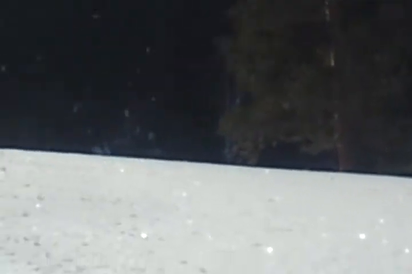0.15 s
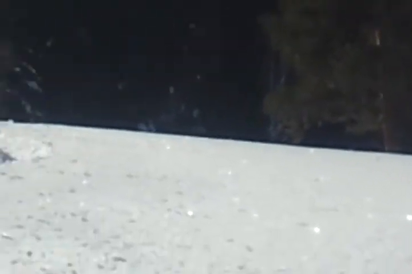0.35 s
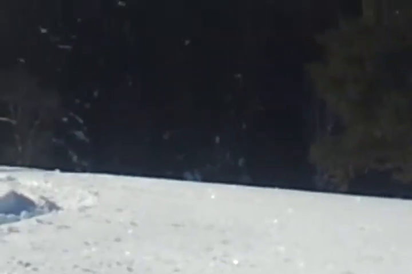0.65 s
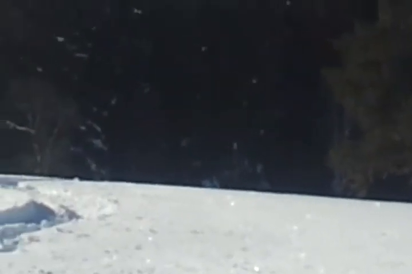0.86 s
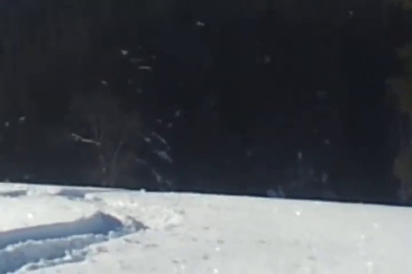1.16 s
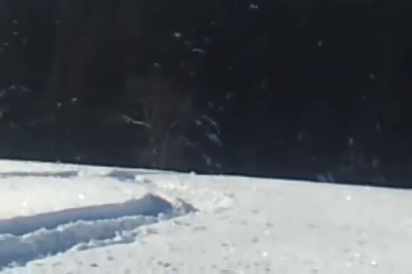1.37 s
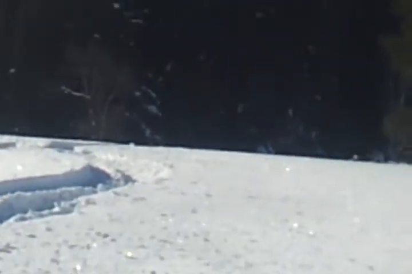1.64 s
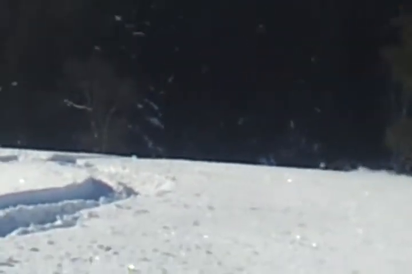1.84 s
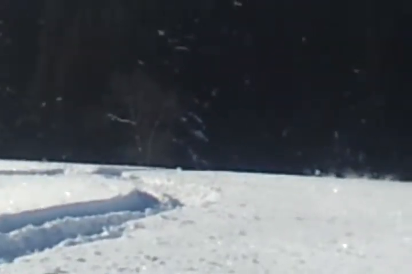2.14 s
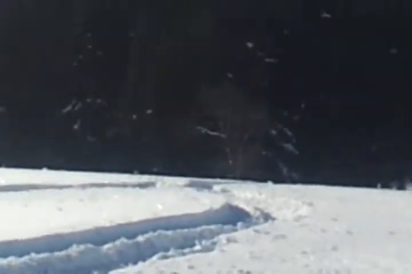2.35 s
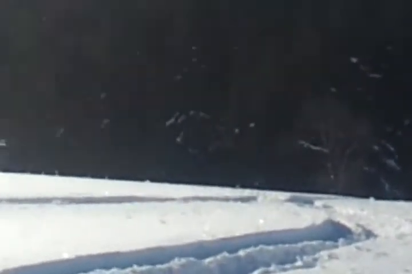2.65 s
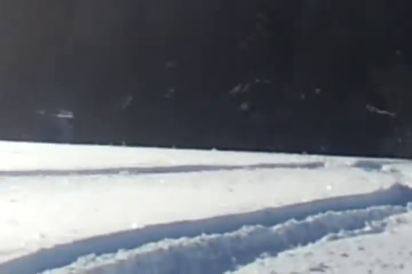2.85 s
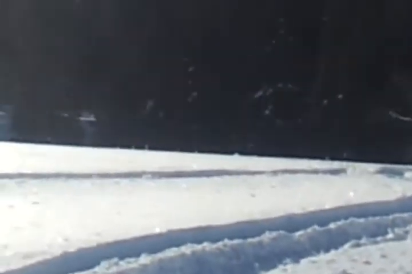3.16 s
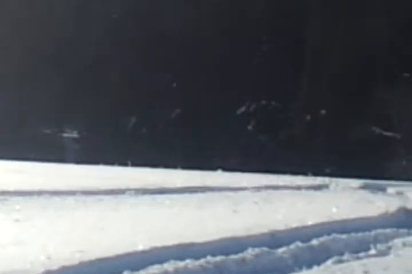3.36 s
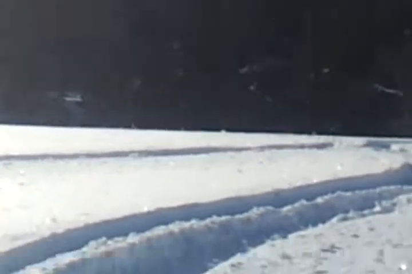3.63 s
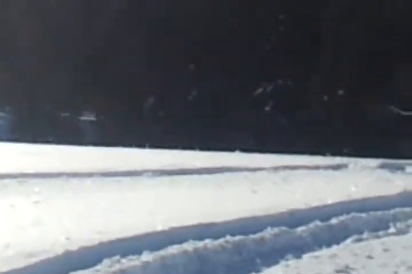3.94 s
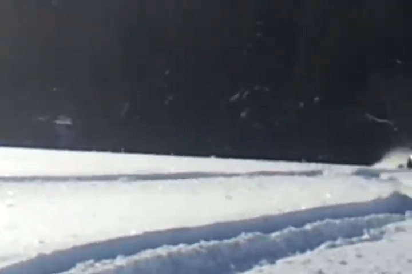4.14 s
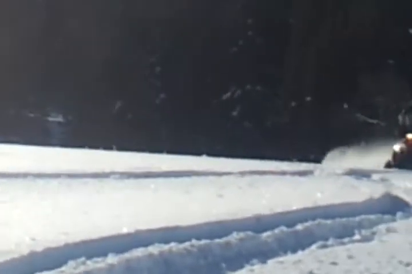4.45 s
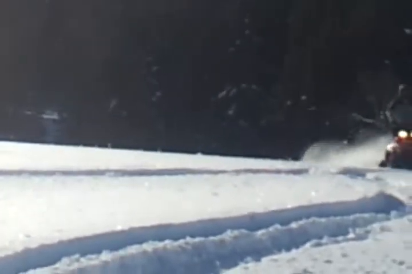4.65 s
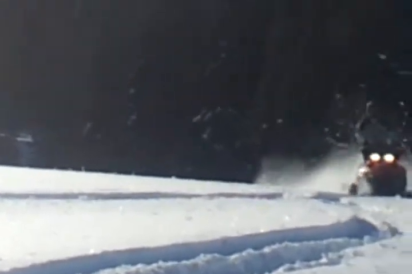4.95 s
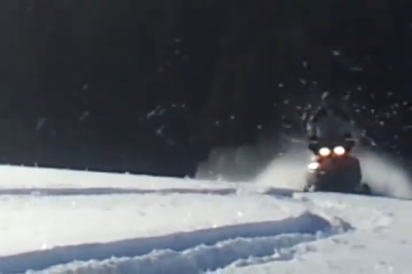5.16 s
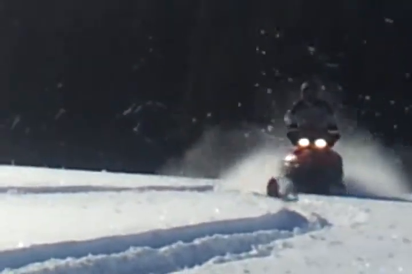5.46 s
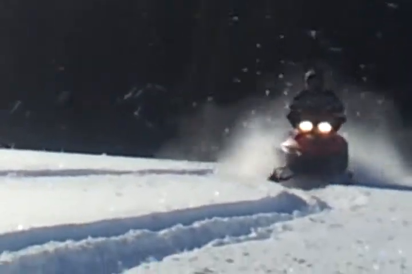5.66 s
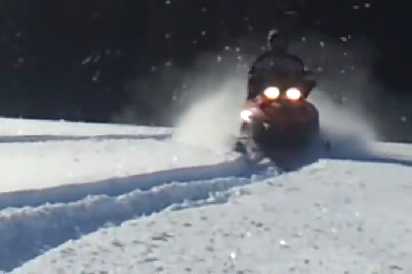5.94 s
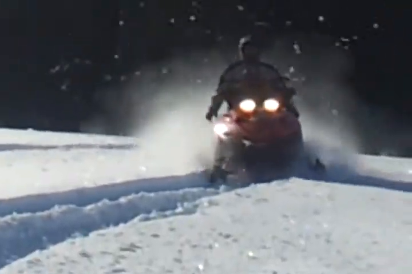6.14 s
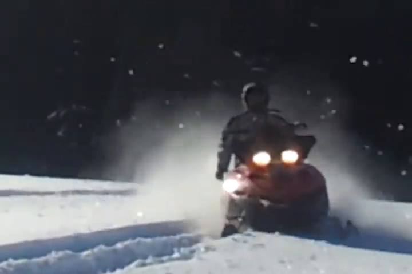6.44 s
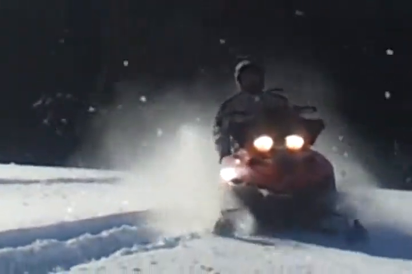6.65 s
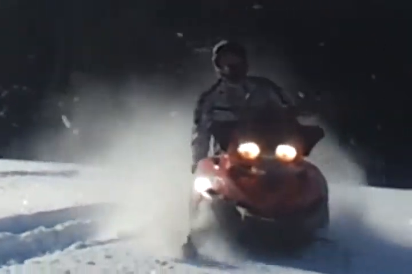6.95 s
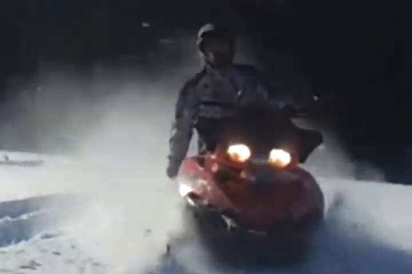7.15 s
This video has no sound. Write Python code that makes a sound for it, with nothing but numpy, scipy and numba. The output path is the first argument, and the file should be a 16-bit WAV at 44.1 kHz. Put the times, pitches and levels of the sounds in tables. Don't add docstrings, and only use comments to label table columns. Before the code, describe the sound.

Distant buzzing throttle surges swell into a long raspy snowmobile pull, then short blips, sharp exhaust pops and a falling engine note amid spraying snow.

```python
import sys
import numpy as np
from scipy import signal
from scipy.fft import rfft, irfft
from scipy.io import wavfile
from scipy.ndimage import uniform_filter1d, map_coordinates
from numba import njit

SR = 44100
rng = np.random.default_rng(int(sys.argv[2]) if len(sys.argv) > 2 else 0)


def elevation(decibels):
    levels = np.asarray(decibels, float)
    return 10 ** (levels / 20)


def to_wav(s):
    ch = np.atleast_2d(s).T
    pcm = np.round(np.clip(ch, -1, 1) * 32767)
    wavfile.write(sys.argv[1], SR, pcm.astype(np.int16))


N = 321930
TIME = np.arange(N) / SR
CREST_S = 2.1


def curves(table):
    s, *columns = np.transpose(table)
    return [np.interp(TIME, s, c) for c in columns]


def between(a, b):
    return 1. * (TIME >= a) * (TIME < b)


def bump(s, width, db):
    return db * np.exp(-((TIME - s) / width) ** 2)


def unit(x):
    return x / np.sqrt(np.mean(x ** 2))


def even(x):
    return x / np.sqrt(uniform_filter1d(x ** 2, SR // 8) + 1e-18)


def walk(rate):
    hold = int(SR / rate)
    steps = np.repeat(rng.standard_normal(N // hold + 1), hold)
    return 1.25 * uniform_filter1d(uniform_filter1d(steps, hold), hold)[:N]


def noise(spectrum):
    hz, db = np.transpose(spectrum)
    bins_hz = np.arange(N // 2 + 1) * SR / N
    gain = elevation(np.interp(np.log(bins_hz + 1), np.log(hz), db, -120, -120))
    return unit(irfft(rfft(rng.standard_normal(N)) * gain, N))


def clicks(at, size):
    out = np.zeros(N + 32)
    taps = np.floor(at)[:, None] + np.arange(-7, 9)
    offset = taps - at[:, None]
    shape = np.sinc(offset) * np.cos(np.pi * offset / 16) ** 2
    np.add.at(out, taps.astype(int) + 8, size[:, None] * shape)
    return out[8:N + 8]


@njit
def svf(x, hz, width):
    out, b, l = np.empty((2, len(x))), 0., 0.
    for i in range(len(x)):
        g, k = np.tan(np.pi * hz[i] / SR), width[i] / hz[i]
        v = (b + g * (x[i] - l)) / (1 + g * (g + k))
        out[0, i], out[1, i] = k * v, x[i] - k * v - l - g * v
        b, l = 2 * v - b, l + 2 * g * v
    return out


def band(x, hz, width):
    return svf(x, np.full(N, 1. * hz), np.full(N, 1. * width))[0]


def tracked(x, hz, width):
    return svf(svf(x, hz, width)[0], hz, width)[0]


def ring(x, modes, alike=0):
    out = 0
    for k, (hz, width, db) in enumerate(modes):
        out = out + (-1) ** max(k - alike, 0) * elevation(db) * band(x, hz, width)
    return out


# frequency in Hz, density in dB per Hz.
RUMBLE = [(12, -53.5), (20, -15), (60, -14), (134, -13), (213, -3.5), (270, -7), (309, -7.5), (348, -13.5),
          (441, -2.5), (568, -2), (700, 1), (910, -38), (1540, -120)]
# centre in seconds, half width in seconds, rise in dB.
GUSTS = [
    (1.63, .04, 5.5),
    (3.451, 0.24, 4.5),
    (5.298, .2, 0),
]


def wind():
    start_db, rise_db = -46.5, 13
    db = start_db + rise_db * (TIME / TIME[-1]) ** 2.32
    db = db + sum(bump(*gust) for gust in GUSTS)
    return elevation(db + 1.4 * walk(8)) * noise(RUMBLE)


# time in seconds, clear echo in dB.
FOREST = [(0, -52), (.4, -43), (.65, -40), (.95, -44.5), (1.12, -39), (1.32, -35.5), (1.45, -45),
          (1.7, -40), (2.2, -47.5), (2.75, -33), (3.4, -42.5), (5.0, -34), (5.6, -42), (7.3, -54)]
# time in seconds, lag in seconds, share of the roar scattered by trunks (0-1).
TREES = [(0, .25, .5), (2.3, .258, .5), (3.0, .282, .5), (4.3, .325, .4), (5.6, .36, .2), (7.3, .38, .05)]


def forest(away):
    t60_s = 0.99
    lag, share = curves(TREES)
    echo_db = curves(FOREST)[0]
    away = signal.sosfilt(signal.butter(2, [380, 2600], "bandpass", fs=SR, output="sos"), away)
    heard_from = np.abs(TIME - uniform_filter1d(lag, SR // 5)) * SR
    echo = map_coordinates(away, [heard_from], order=1)
    age = np.arange(SR) / SR
    decay = np.exp(-np.log(1000) * age / t60_s)
    trunks = rng.standard_normal(SR) * np.minimum(age / 0.035, 1) * decay
    wash = signal.fftconvolve(np.r_[away[SR:0:-1], away], trunks)[SR:SR + N]
    return elevation(echo_db + 2.5 * walk(15)) * echo, even(wash), share


# frequency in Hz, density in dB per Hz.
ROAR = [(350, -34.5), (600, -6), (866, 0.5), (1180, 6), (1460, 0.5), (1660, 6.5), (2190, 3), (3110, -21.5),
        (3370, -11.5), (3750, -8), (4200, -14.5), (5460, -46), (9240, -120)]
# frequency in Hz, density in dB per Hz.
HISS = [(1760, -22.5), (3000, -7.5), (3210, -13), (3380, -16), (3750, -6), (4410, -9.5), (4980, -7.5),
        (5880, -2), (6710, -1), (7320, -6.5), (8090, -16), (8590, -17), (8950, -27), (11600, -50),
        (19700, -120)]
# time in seconds, level in dB, powder spray over it in dB.
PLOUGH = [(0, -44.5, -15), (.25, -44, -7), (.7, -42, -16), (1.2, -40, -10), (1.7, -38.5, -7.5),
          (2.0, -38.5, -13), (2.5, -37, -1), (2.75, -35, -1), (3.25, -31, 2.5), (3.75, -30.5, -4),
          (4.2, -24.5, -8), (4.38, -35, -5.5), (5.05, -30, -4), (5.4, -31, -1), (5.9, -31, -3),
          (6.15, -27.5, 0), (6.9, -26.5, 3), (7.3, -25, 0.5)]


def snow(wash, share, throttle):
    level_db, spray_db = curves(PLOUGH)
    load_db = 1 * (uniform_filter1d(throttle, int(.08 * SR)) - .5)
    track = elevation(2.0 * walk(25) + 0.21 * walk(150)) * noise(ROAR)
    roar = elevation(level_db + load_db) * (np.sqrt(share) * wash + np.sqrt(1 - share) * track)
    hiss = elevation(1.2 * walk(12) + 1.1 * walk(200)) * noise(HISS)
    return roar + elevation(level_db + spray_db + 2.0) * hiss


# centre in Hz, width in Hz, level in dB.
EXHAUST = [(600, 105, 3.5), (970, 326, 9), (1688, 242, 2.5), (2205, 287, -6), (2493, 1240, -17)]


def exhaust(x):
    silencer = signal.butter(4, 2980, fs=SR, output="sos")
    return signal.sosfilt(silencer, ring(x, EXHAUST, alike=2))


# time in seconds, peak in dB, thump minus crack in dB.
POPS = [
    (4.233, -17, -45),
    (4.416, -20, -16),
    (4.742, -10, -31),
    (5.095, -20.5, -12),
    (5.184, -12.5, -21.5),
    (5.238, -9, -25),
    (5.29, -19, -22),
    (5.321, -16, -31),
    (5.734, -13, -22),
    (6.145, -7, -18.5),
]


def backfires():
    s, db, thump_db = np.transpose(POPS)
    at = (s + .001) * SR
    crack = exhaust(clicks(at, -elevation(db)))
    crack = crack * elevation(db.max()) / np.abs(crack).max()
    thump = band(clicks(at, -elevation(db + thump_db)), 180, 45) * SR / 100
    fade = np.exp(-1 / (0.0087 * SR))
    rattle = signal.lfilter([1], [1, -fade], clicks(at, elevation(db - 17.5)))
    return elevation(4) * crack + thump + rattle * noise(ROAR)


# from and to in seconds, firing rate at opening and at closing in Hz,
# exhaust level at closing in dB.
SURGES = [
    (0, .15, 197.6, 210.3, -55.5),
    (.21, .51, 180.7, 229.4, -55),
    (.7, 1.09, 170.2, 240.3, -50.5),
    (1.24, 1.57, 176.7, 218.7, -55),
    (1.64, 1.93, 203.5, 227.7, -47),
    (4.42, 4.615, 172.4, 212.1, -26.5),
    (4.745, 5.0, 176.1, 209.7, -29.5),
    (5.32, 5.63, 168.1, 183.6, -30),
]
# time in seconds, firing rate in Hz.
PULL = [(2.1, 176.6), (2.36, 237), (2.625, 261.7), (2.89, 235.5), (3.15, 242), (3.41, 254.3),
        (3.675, 247.4), (3.94, 249.5), (4.211, 259.4)]
# time in seconds, exhaust in dB, hard edge over it in dB.
SWING = [(2.1, -56, -33), (2.38, -40.5, -25), (2.53, -25, -7.5), (2.78, -32, -10), (3.0, -21.5, -9.5),
         (3.35, -20, 0), (3.55, -23, -1.5), (3.73, -29, -9), (4.05, -16.5, -9.5)]
# start in seconds, length in seconds, exhaust level in dB.
SPUTTERS = [
    (4.222, .015, -26),
    (4.75, 0.12, -36),
    (5.093, .07, -34),
    (5.189, .045, -29),
    (5.234, .03, -30),
    (5.288, 0.037, -30.5),
    (5.72, 0.045, -39),
]
# time in seconds, firing rate in Hz.
COAST = [(6.05, 142.5), (6.2, 140.2), (6.95, 120.1), (7.3, 114.6)]


def rider():
    sag_s, inertia_s, tops_out_s = .125, 0.055, .04
    climb_bend = .85
    swell_db = (11.5, 7.5)
    s, pull_hz = np.transpose(PULL)
    pulling = between(s[0], s[-1])
    place = np.interp(TIME, s, np.arange(len(s)))
    pull = map_coordinates(pull_hz, [place], mode="mirror")
    long_pull = (s[0], s[-1], pull_hz[0], pull_hz[-1], -99)
    opened = sorted(SURGES + [long_pull]) + [(COAST[0][0], 0, COAST[0][1])]
    hz, throttle, gain = curves(COAST)[0], 0, pulling * elevation(curves(SWING)[0])
    for (a, b, low, top, db), (c, _, next_hz, *_) in zip(opened, opened[1:]):
        peak = b - tops_out_s
        drop = (peak + b) / 2
        climb = np.clip((TIME - a) / (peak - a), 0, 1)
        sag = np.expm1(-np.clip(TIME - drop, 0, c - drop) / sag_s) / np.expm1((drop - c) / sag_s)
        revs = low + (top - low) * climb ** climb_bend + (next_hz - top) * sag
        hz = np.where(between(a, c), revs, hz)
        throttle = throttle + between(a, b)
        gain = gain + between(a, b) * elevation(db - swell_db[CREST_S < a] * (1 - climb))
    gain = gain + sum(between(a, a + length) * elevation(db) for a, length, db in SPUTTERS)
    hz = uniform_filter1d(np.where(pulling, pull, hz), int(inertia_s * SR))
    return hz, *uniform_filter1d([throttle, gain], int(0.0097 * SR))


def firings(turns, scatter_db):
    count = np.arange(1, int(turns[-1]))
    at = np.interp(count, turns, np.arange(N))
    chance = rng.standard_normal((N // 100, 2))[count].T
    scatter_db = scatter_db[at.astype(int)]
    at = np.clip(at + scatter_db * chance[0], 8, N - 9)
    return -clicks(at, elevation(scatter_db * chance[1] - scatter_db ** 2 / 10))


# time in seconds, level in dB.
LUGS = [(0, -63), (4.2, -70.5), (6.2, -47.5), (6.6, -40), (6.9, -38), (7.3, -42)]


def track_lugs(hz, turns):
    throb_db = curves(LUGS)[0]
    rumble = elevation(throb_db) * unit(tracked(rng.standard_normal(N), .6 * hz, 0.26 * hz))
    return rumble + elevation(throb_db - 2 + 2.5 * walk(12)) * np.sin(3 * np.pi * turns)


# firing orders one to five in dB, at an exhaust level of -27.5 dB.
HIDDEN = (-44, -39, -41.5, -35, -38)
CRESTING = (-41, -28.5, -32.5, -35.5, -35.5)
BROADSIDE = (-40.5, -34, -32, -27.5, -33.5)
TURNING = (-34, -39, -29, -38, -34.5)
LEANING = (-28, -34.5, -22, -32.5, -50)
ROLLING = (-43, -34, -26, -31, -35)
HEAD_ON = (-50.5, -34.5, -28.5, -37, -27.5)
CLOSE = (-33, -31, -28, -27, -27.5)
FACES_S = (CREST_S, 2.43, 2.45, 2.72, 4.2, 4.3, 5.26, 5.34, 5.62, 5.68, 5.47, 7.045)
FOLLOW = (0.18, 0.41, 0.42, 0.76, 0.5)
SHUT_ORDERS_DB = (-2, -6, -15, -6, -8)
NULL_ORDERS = (0, 0, 3, 4, 0, 1, 2, 2, 3)
# centre in seconds, half width in seconds, depth in dB.
NULLS = [(2.84, 0.14, -12), (3.85, 0.28, -9), (3.03, 0.12, -9), (3.29, 0.04, -6), (4.26, 0.036, -6),
         (4.9, 0.11, -20), (4.97, 0.077, -14), (5.17, .1, -2.5), (6.45, 0.25, -2)]


def low_orders(orders, loud, shut):
    held = np.repeat([CRESTING, BROADSIDE, TURNING, LEANING], 2, axis=0)
    faces = np.transpose([HIDDEN, *held, ROLLING, HEAD_ON, CLOSE])
    drone = 0
    for k, order in enumerate(orders):
        null_db = sum(bump(*row) for j, row in zip(NULL_ORDERS, NULLS) if j == k)
        db = np.interp(TIME, FACES_S, faces[k]) + SHUT_ORDERS_DB[k] * shut + null_db + walk(5.4)
        drone = drone + elevation(db) * (loud / elevation(-27.5)) ** FOLLOW[k] * even(order)
    return drone


# centre in Hz, width in Hz, level in dB.
EDGE = [(2732, 386, 4.5), (3757, 123.4, 4.5), (4240, 330, 2.5), (5280, 550, 6), (5969, 710, 6),
        (7000, 520, -0.5)]


def outlet(pulses, turns):
    bounced = 0.45 * np.roll(pulses, int(.0018 * SR))
    cowl = ring(-pulses - bounced, [(hz, width, db + 3.0 * walk(4.16)) for hz, width, db in EDGE])
    gas = np.exp(-(turns % 1) / .3) * noise(HISS)
    return even(cowl) + .3 * gas


def engine(hz, throttle, gain):
    shut_db, coast_db, cowl_db = -21.5, -9.5, -11.5
    level_db, spray_db = curves(PLOUGH)
    pull = between(PULL[0][0], PULL[-1][0])
    coast = np.clip((TIME - SURGES[-1][1]) / 0.023, 0, 1)
    loud = gain + elevation(level_db + shut_db + (coast_db - shut_db) * coast)
    states = [TIME < 2.3, pull > 0, TIME < 4.26, between(5.09, 5.31) > 0, coast > 0]
    scatter_db = np.select(states, [1, .35, 4, 4, .55], .5)
    turns = np.cumsum(hz) / SR
    pulses = firings(turns, scatter_db)
    pipe = exhaust(pulses)

    orders = [tracked(pipe, k * hz, .3 * hz) for k in range(1, 6)]
    shut = 1 - np.clip(gain / elevation(level_db - 14.5) + coast, 0, 1)
    carry = np.where(TIME < CREST_S, 0.3 + throttle, 1)
    drone = carry * low_orders(orders, loud, shut)
    bark = loud * even(svf(pipe - sum(orders), 3.4 * hz, 5 * hz)[1])
    edge_level = pull * gain * elevation(curves(SWING)[1]) + elevation(level_db + spray_db + cowl_db)
    edge = edge_level * outlet(pulses, turns)
    near = track_lugs(hz, turns) + drone + bark - edge
    away = even(pipe + 2.2 * band(pulses, 492, 70)) * (.14 + throttle)
    return near, away


def scene():
    hz, throttle, gain = rider()
    near, away = engine(hz, throttle, gain)
    echo, wash, share = forest(away)
    return (wind() + echo + snow(wash, share, throttle) + backfires() + near)[None]


def roll_off(x):
    return signal.sosfilt(signal.butter(12, 15100, fs=SR, output="sos"), x)


# centre in Hz, width in Hz, depth (0-1).
NOTCHES = [(1400, 110, 0.54), (3350, 97, 0.3), (5100, 95, 1), (7910, 550, 1)]


def record(dry):
    x = dry[0]
    for hz, width, depth in NOTCHES:
        x = x - depth * band(x, hz, width)
    x = signal.sosfilt(signal.butter(8, 7500, fs=SR, output="sos"), x)
    x = signal.sosfilt(signal.ellip(10, .5, 90, 9150, fs=SR, output="sos"), x)
    mix = np.clip(x, -.715, .715)[None]
    return roll_off(mix)


dry = scene()
out = record(dry)
to_wav(out)
```